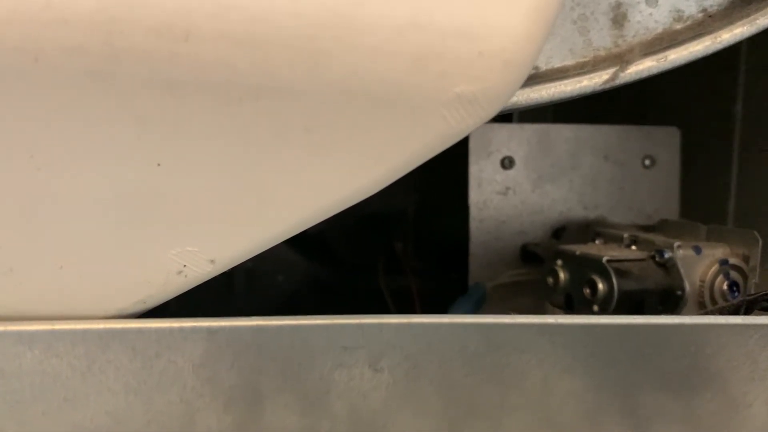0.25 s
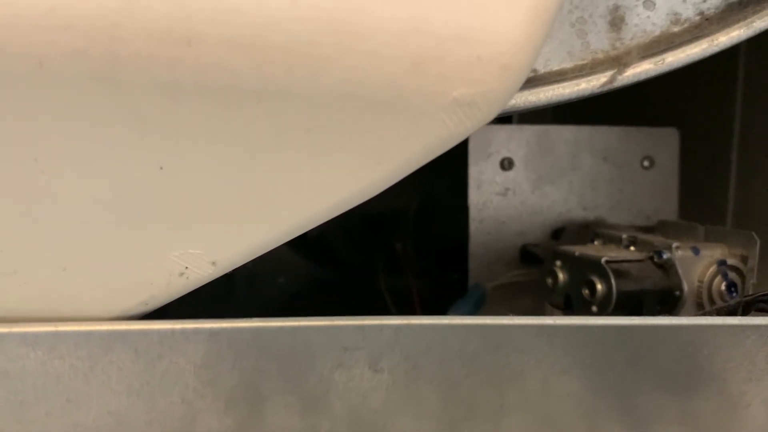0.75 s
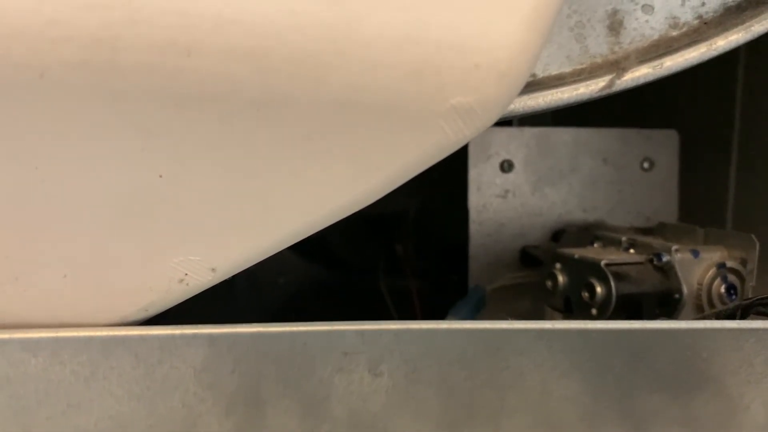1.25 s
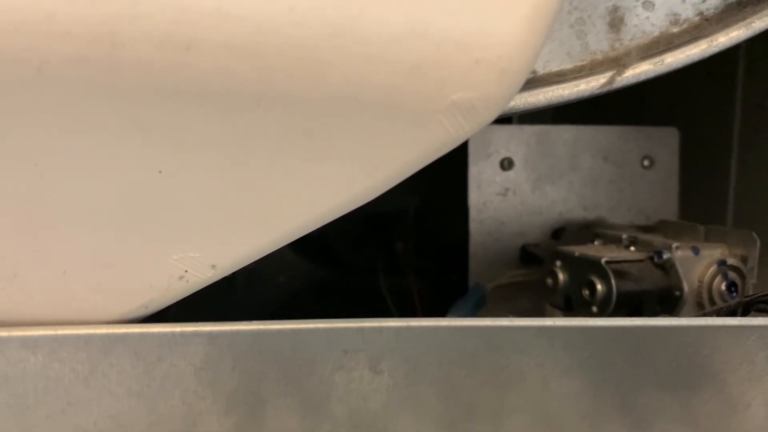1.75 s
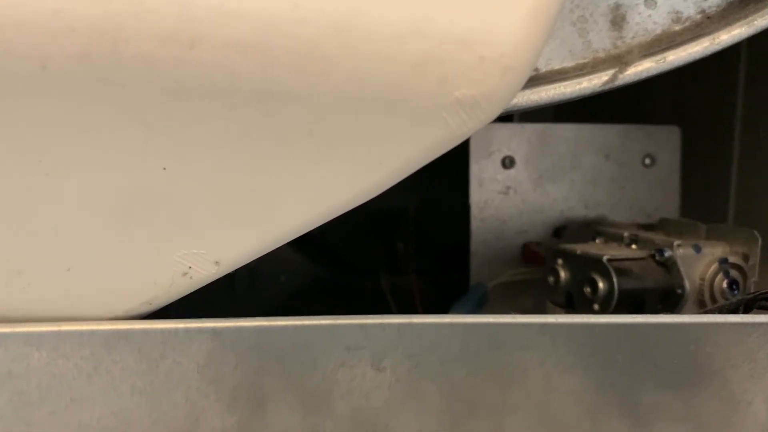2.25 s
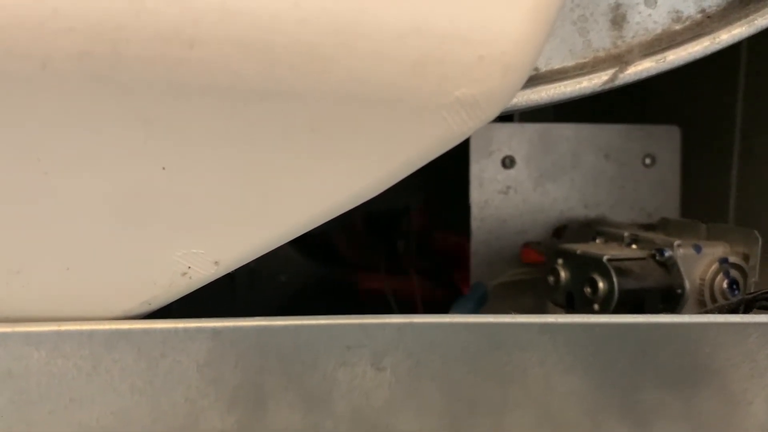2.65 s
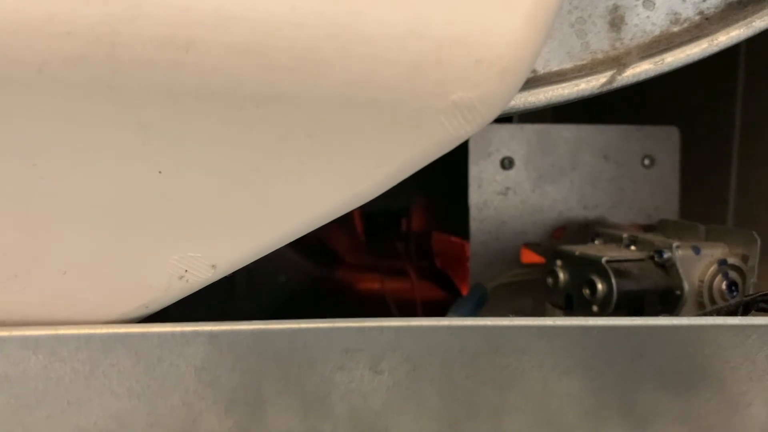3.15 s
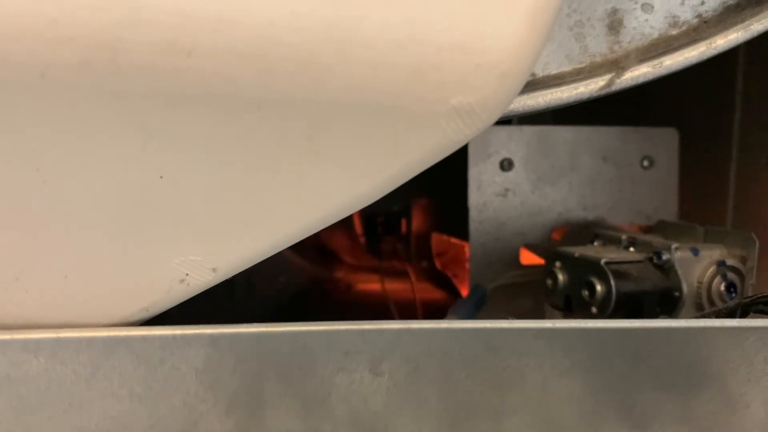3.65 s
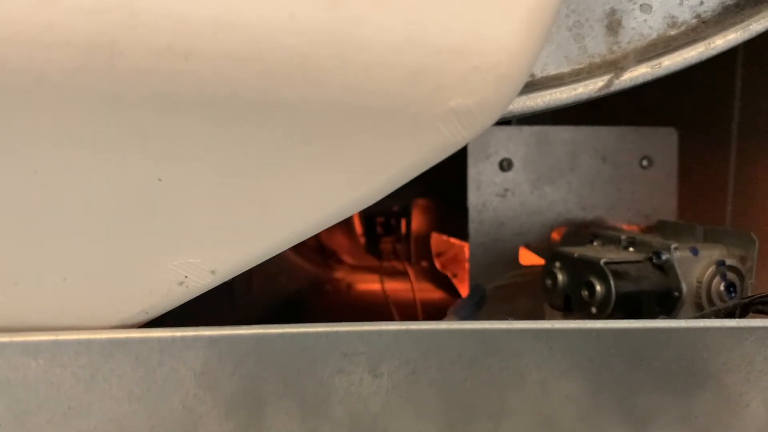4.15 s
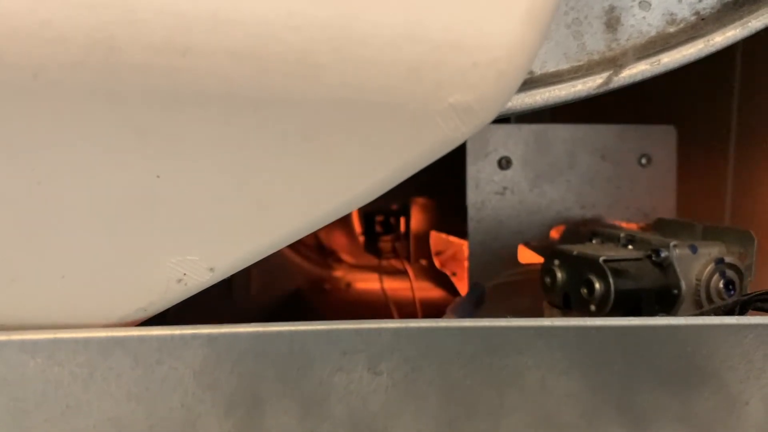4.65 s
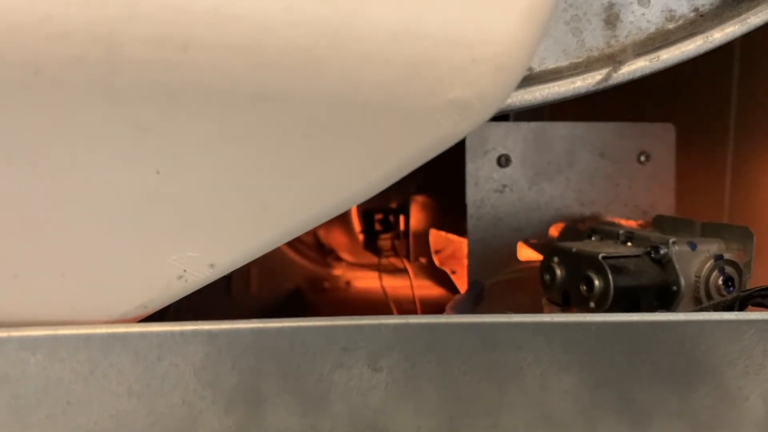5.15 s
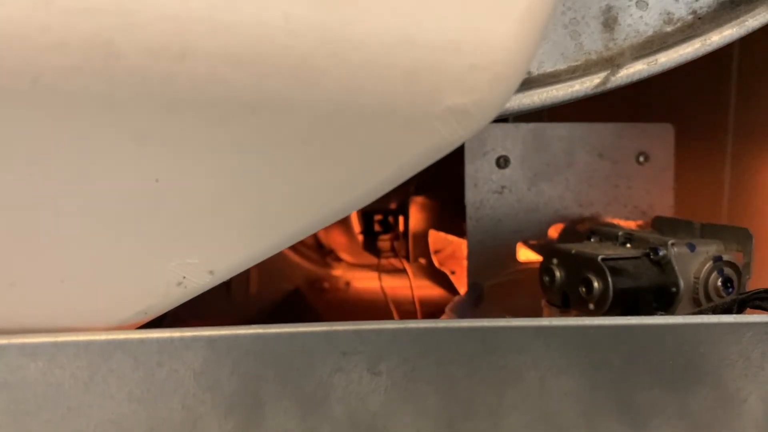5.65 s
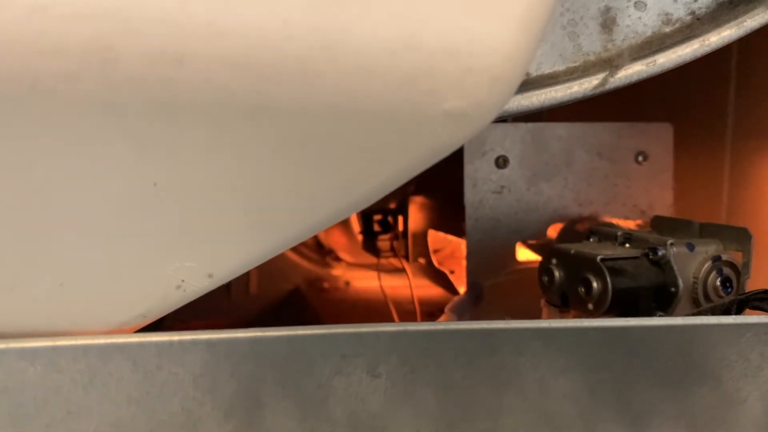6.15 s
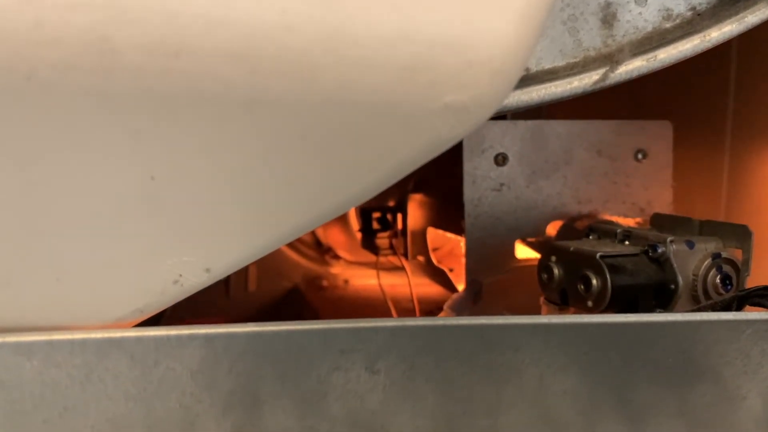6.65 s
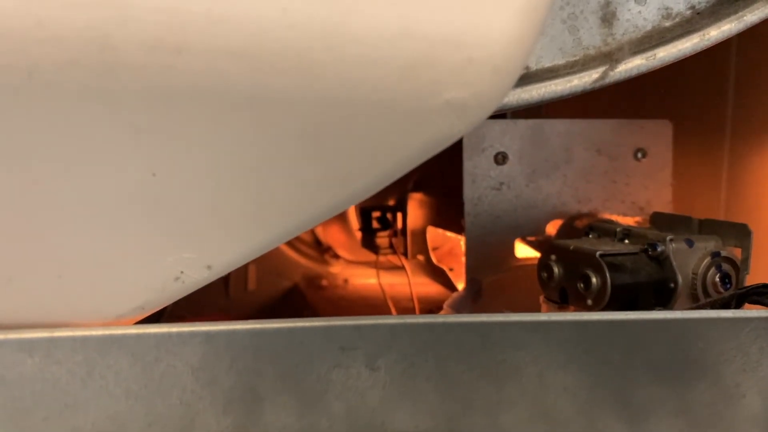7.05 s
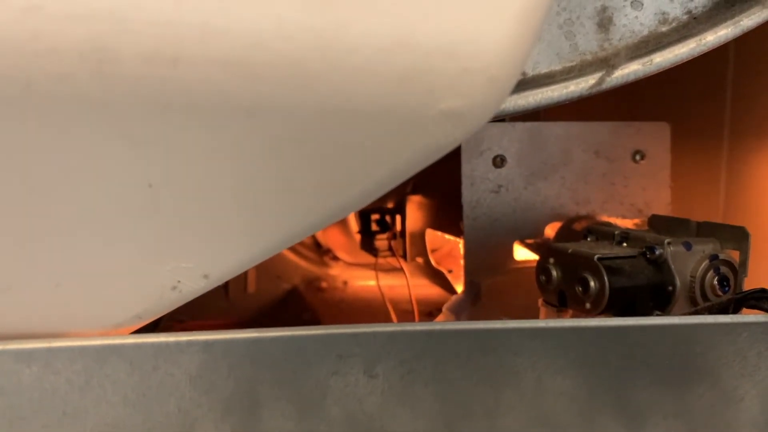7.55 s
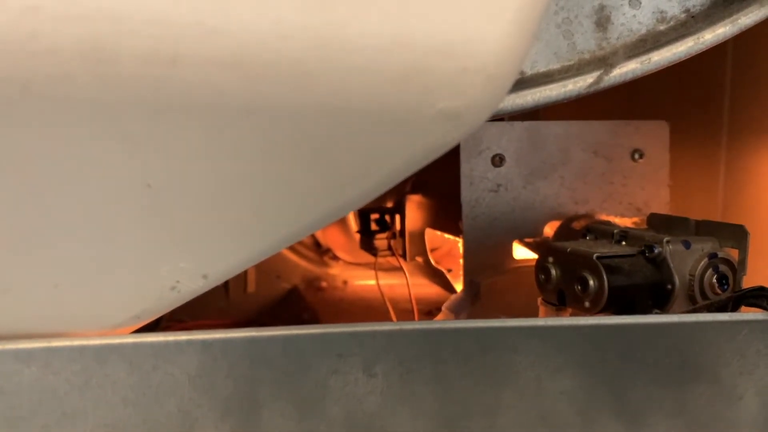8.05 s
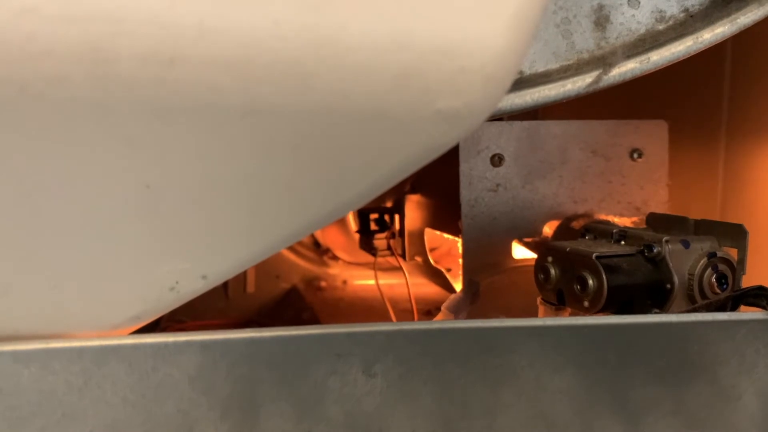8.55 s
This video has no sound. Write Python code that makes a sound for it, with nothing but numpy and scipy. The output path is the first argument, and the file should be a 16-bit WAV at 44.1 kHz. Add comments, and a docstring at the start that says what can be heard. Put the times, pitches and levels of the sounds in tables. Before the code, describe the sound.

Inside an opened gas dryer, heard very close in stereo: a throbbing low electrical motor hum with a faint whine, rolling drum and blower rumble, soft air hiss. Under a second in, a gas valve solenoid snaps with a rattling metallic crack and short ring. The background dips briefly, recovers, and runs steadily; near six seconds everything steps up in level.

```python
"""The motor of a gas dryer hums and whines, heard close with the front panel open: tones at multiples and
sums of the hum and shaft rates. Drum and blower rumble as noise through cabinet resonances. A gas valve's
solenoid snaps in as the igniter starts to heat: cracks, struck modes and a fading ring. Air hisses and the
burner duct surges as coloured noise. The recorder's limiter ducks under the snap; near six seconds the
whole sound steps up in level."""
import sys
import numpy as np
from scipy import signal
from scipy.fft import rfft, irfft, next_fast_len
from scipy.io import wavfile
from scipy.ndimage import uniform_filter1d, minimum_filter1d, map_coordinates

SR = 44100
rng = np.random.default_rng(int(sys.argv[2]) if len(sys.argv) > 2 else 0)


def transcribe(signal):
    """Save signal, clipped to [-1, 1], as a 16-bit WAV file at the path in sys.argv[1]."""
    frames = np.atleast_2d(signal).T
    limited = np.clip(frames, -1, 1)
    pcm = np.round(limited * 32767).astype(np.int16)
    wavfile.write(sys.argv[1], SR, pcm)


N = 388950

HUM_HZ, SHAFT_HZ, POLES = 119.86, 29.257, 4
TOP_HZ = 15850  # band limit
LEAD_S = 0.0004408  # sound reaches the left microphone first
TREBLE_HZ, TREBLE_LAG_S = 6530, 0.00021  # lead shrinks above this pitch, at this slope in s


def amp(db):
    """Decibels to gain."""
    return 10 ** (np.asarray(db) / 20)


def unit(x):
    """x at rms 1."""
    return x / np.sqrt(np.mean(x ** 2) + 1e-20)


def along(points, hz):
    """(Hz, value) points read on a log axis."""
    f, v = np.transpose(points)
    return np.interp(np.log(hz + 1), np.log(f + 1), v)


def clock():
    """The time of every sample in seconds."""
    return np.arange(N) / SR


def wobble(rate_hz):
    """A smooth random curve, rate_hz knots a second."""
    knots = rng.standard_normal(int(N * rate_hz / SR) + 4)
    coarse_s = clock()[::64]
    curve = map_coordinates(knots, [coarse_s * rate_hz], mode="nearest")
    return np.interp(clock(), coarse_s, curve)


def bell(hz, centre_hz, half_width_hz):
    """Gain of a cluster of close resonances."""
    return 1 / (1 + ((hz - centre_hz) / half_width_hz) ** 2)


# Likeness of the two microphones. Each row: frequency in Hz, coherence from 0 to 1.
MIC_COHERENCE = [(60, 0.83), (170, 1), (290, 0.91), (380, 1), (480, 0.87), (620, 0.67), (800, 0.047),
                 (1600, 0.22), (2600, 0.11), (5500, 0.18), (8300, 1), (15000, 0.97)]


def at_microphones(pair, colour):
    """Two unrelated sounds, coloured and blended into what two spaced microphones hear."""
    size = pair.shape[1]
    fft_size = next_fast_len(size + 8192, True)
    hz = np.fft.rfftfreq(fft_size, 1 / SR)
    a, b = rfft(pair, fft_size)
    turn = np.arccos(np.clip(along(MIC_COHERENCE, hz), 0, 1)) / 2
    lead_cycles = LEAD_S * np.minimum(hz, TREBLE_HZ) - TREBLE_LAG_S * np.maximum(hz - TREBLE_HZ, 0)
    left = np.cos(turn) * a + np.sin(turn) * b
    right = (np.cos(turn) * a - np.sin(turn) * b) * np.exp(-2j * np.pi * lead_cycles)
    return irfft(np.array([left, right]) * colour(hz), fft_size)[:, :size]


def stereo_noise(colour):
    """Noise at the two microphones; colour gives its amplitude per root Hz."""
    return at_microphones(rng.standard_normal((2, N)) * np.sqrt(SR / 2), colour)


def tone(hz, t, left_db, right_db, lead_s, start_cycles):
    """A sine at the two microphones on the time base t; the left leads by lead_s."""
    phase = 2 * np.pi * (hz * np.array([t, t - lead_s]) + start_cycles)
    return amp([[left_db], [right_db]]) * np.sqrt(2) * np.sin(phase, dtype=np.float32)


def motor():
    """An induction motor: every tone follows from the hum rate and the shaft rate."""
    return hum() + rotor() + whine()


# Magnetic hum, one row per harmonic from the first up. Each row: left level in dB rms, right level in
# dB rms, lead of the left in seconds, level of the beating rotor tone in dB relative to the harmonic.
HUM_HARMONICS = [(-38.5, -39.8, .0003, -14), (-48.5, -50, -.00077, -5), (-59, -51, .0011, -16),
                 (-63, -62.5, 0.0062, -15), (-52, -55.5, .0003, -24)]


def hum(level_db=0., waver_db=1.2, in_step_s=0.183):
    """Hum at twice the mains rate throbs as the slipping rotor's poles fall in and out of step with it."""
    t = clock() - in_step_s  # rotor and hum in step at t = 0: the throb crests
    out = np.zeros((2, N))
    for k, (left_db, right_db, lead_s, throb_db) in enumerate(HUM_HARMONICS, 1):
        place = left_db, right_db, lead_s, rng.random()
        magnetic = tone(k * HUM_HZ, t, *place)
        slipping = amp(throb_db) * tone(k * POLES * SHAFT_HZ, t, *place)
        out += amp(level_db + waver_db * wobble(5.1)) * (magnetic + slipping)
    return out


# Stereo balance of shaft tones and sidebands. Each row: frequency in Hz, left minus right in dB.
TONE_BALANCE = [(60, 8.5), (330, 2.5), (390, 7), (730, 15), (1400, 2.5)]


def panned(hz, t, db):
    """A tone of the rotor, placed by its pitch."""
    pan_db = along(TONE_BALANCE, hz)
    return tone(hz, t, db + pan_db / 2, db - pan_db / 2, LEAD_S, rng.random())


# Tones of the turning rotor and blower wheel. Each row: multiple of the shaft rate, level in dB rms.
SHAFT_ORDERS = [(2, -59), (5, -63), (6, -57.5), (10, -62.5), (25, -69.5), (37, -72), (44, -69)]
# Sidebands one shaft rate either side of the hum harmonics. Each row: frequency in Hz, level in dB rms.
HUM_SIDEBANDS = [(90, -68), (150, -56.5), (210, -57), (270, -62.5), (330, -54.5), (390, -62), (630, -70)]


def rotor(level_db=0.):
    """The rotor sounds its own orders and, slightly off centre, puts sidebands on the hum."""
    t, out = clock(), np.zeros((2, N))
    for order, db in SHAFT_ORDERS:
        out += panned(round(order) * SHAFT_HZ, t, db)
    for k in range(1, len(HUM_HARMONICS) + 1):
        for side in (-1, 1):
            hz = k * HUM_HZ + side * SHAFT_HZ
            out += panned(hz, t, along(HUM_SIDEBANDS, hz))
    return amp(level_db) * out


# Sidebands higher up, heard as a whine. Each row: frequency in Hz, level in dB.
WHINE_SIDEBANDS = [(700, -78), (850, -73.5), (1060, -89), (1170, -72.5), (1320, -84), (1410, -65),
                   (1530, -80.5), (1590, -76), (1650, -71), (1890, -86), (1950, -94), (2067, -74.5),
                   (2130, -87.5)]


def whine(level_db=0., centre_db=-10.0, slip_s=.00006, waver_db=0.3, count=13):
    """Higher hum harmonics, set below their two sidebands, waver as the drum's load drags on the rotor."""
    t, out = clock() + slip_s * wobble(2.49), np.zeros((2, N))
    for k in len(HUM_HARMONICS) + 1 + np.arange(count):
        group = np.zeros((2, N))
        for side, relative_db in [(-1, 0), (0, centre_db), (1, 0)]:
            hz = k * HUM_HZ + side * SHAFT_HZ
            group += panned(hz, t, along(WHINE_SIDEBANDS, hz) + relative_db)
        out += amp(level_db + waver_db * wobble(4.5)) * group
    return out


# Cabinet resonances stirred by drum and blower. Each row: centre in Hz, half width in Hz, left peak in
# dB per Hz, right peak in dB per Hz.
CABINET_MODES = [(38, 2.8, -78, -69), (70, 21.5, -67, -66.5), (115.3, 19.5, -62, -62.5),
                 (153, 16, -67.5, -66.5), (180.7, 7.3, -62.5, -65), (195, 8.7, -64.5, -65),
                 (236, 19, -67, -69), (290.4, 12, -71, -69.5), (345.2, 14.5, -64.5, -68),
                 (407.2, 7.5, -67, -70.5), (451.8, 11.5, -64, -71.5), (525, 45.6, -66, -74),
                 (571.7, 8.9, -64.5, -69.5), (618, 9.6, -70.5, -80.5), (637.6, 4.8, -70.5, -77)]


def drum(level_db=0., swell_db=0.85):
    """The rolling drum and the blower shake the cabinet's panels and cavity."""
    def panels(hz):
        power = 0
        for centre_hz, half_width_hz, left_db, right_db in CABINET_MODES:
            power = power + (amp([[left_db], [right_db]]) * bell(hz, centre_hz, half_width_hz)) ** 2
        return np.sqrt(power)

    return amp(level_db + swell_db * wobble(7)) * stereo_noise(panels)


def valve():
    """The gas valve's solenoid snaps in."""
    return plunger() + ring()


def add(track, s, sound):
    """Mix a sound into the track at time s."""
    track[:, round(s * SR):][:, :sound.shape[1]] += sound


# Modes of the valve and its bracket. Each row: centre in Hz, half width in Hz, then the level in dB as
# struck, as they clang and as they linger.
BRACKET_MODES = [(1735, 110, -46, -38, -56), (2380, 85, -35.5, -41, -56), (3134, 60, -30.5, -34, -49.5),
                 (3990, 100, -28, -34, -48), (4560, 140, -44, -42, -60), (5420, 120, -37, -39.5, -58),
                 (6420, 200, -37, -39, -59), (6930, 200, -36, -37, -54), (7260, 160, -35, -27, -51),
                 (8060, 130, -27.5, -35, -49), (9600, 200, -41, -38, -59), (12500, 350, -43, -45, -64),
                 (15100, 450, -43, -41, -63)]
# Contacts of the solenoid plunger. Each row: start in seconds, level in dB, brightness in dB per octave.
PLUNGER_CONTACTS = [(0.6976, -7, 8), (0.701, -8, 3), (0.7066, -8, 2), (0.7114, 1.5, 3.5),
                    (0.7148, 0.5, 1.5), (0.716, 3, -3), (0.7183, -4.5, 4), (0.7242, -2, 1),
                    (0.7338, -8, -3), (0.7423, -6, 0), (0.7505, -10, -2)]


def plunger(level_db=0., crack_db=-26.5, crack_t60_s=0.027, mode_t60_s=0.038, rise_s=0.00014,
            pivot_hz=6000, low_cut_hz=850):
    """The plunger ticks, slams and rattles to rest: each contact is a crack and a knock of the modes."""
    out, t = np.zeros((2, N)), np.arange(SR // 8) / SR

    def fade(t60_s):
        return amp(-60 * t / t60_s) * (1 - np.exp(-t / rise_s))

    for start_s, db, brightness in PLUNGER_CONTACTS:
        def colour(hz):
            octaves = np.log2(np.clip(hz, BRACKET_MODES[0][0], TOP_HZ) / pivot_hz)
            return amp(brightness * octaves) * hz ** 2 / (hz ** 2 + low_cut_hz ** 2)

        knock = np.zeros((2, len(t)))
        for centre_hz, half_width_hz, struck_db, _, _ in BRACKET_MODES:
            phase = 2 * np.pi * rng.random((2, 1))
            # each contact stirs another member of every cluster
            hz = centre_hz + rng.uniform(-1.06, 1, (2, 1)) * half_width_hz
            knock += amp(struck_db) * np.sqrt(2) * np.sin(2 * np.pi * hz * t + phase)
        crack = amp(crack_db) * rng.standard_normal((2, len(t)))
        contact = fade(mode_t60_s) * knock + fade(crack_t60_s) * crack
        add(out, start_s, amp(level_db + db) * at_microphones(contact, colour))
    return out


def burst(colour):
    """One and a half seconds of coloured stereo noise at rms 1."""
    return unit(at_microphones(rng.standard_normal((2, 3 * SR // 2)), colour))


def dying(x, t60s):
    """x with each frequency fading at its own speed."""
    hz, t, bins = signal.stft(x, SR, nperseg=256)
    faded = bins * amp(-60 * t / along(t60s, hz)[:, None])
    return signal.istft(faded, SR, nperseg=256)[1][:, :x.shape[1]]


# Colour of the sheet steel around the valve. Each row: frequency in Hz, relative level in dB.
STEEL_COLOUR = [(100, -8), (500, 1), (850, 9), (1100, 1), (1500, 5), (2800, 1), (4800, -2), (5800, 2),
                (8500, 2), (11000, -2), (15500, -6)]
# Decay of the clang. Each row: frequency in Hz, time to fall 60 dB in seconds.
CLANG_T60 = [(1700, 0.28), (3000, 0.29), (7300, 0.2), (14000, 0.14)]
# Decay of the lingering ring. Each row: frequency in Hz, time to fall 60 dB in seconds.
LINGER_T60 = [(1000, 1.8), (3100, 1.6), (4000, 1.46), (7500, 0.95), (12000, 0.39)]


def ring(clang_db=0.0, linger_db=0., sheet_db=-28.5, sheet_linger_db=-44.0, start_s=.716, rise_s=0.0033,
         beat_db=2.5, split_share=.0009):
    """Bracket and steel ring on: a short clang, then a faint shimmer of split modes, each beating."""
    def sheet(hz):
        return amp(along(STEEL_COLOUR, hz))

    clang, linger = amp(sheet_db) * burst(sheet), amp(sheet_linger_db) * burst(sheet)
    t = clock()[:linger.shape[1]]
    for centre_hz, half_width_hz, _, mode_clang_db, mode_linger_db in BRACKET_MODES:
        def cluster(hz):
            return bell(hz, centre_hz, half_width_hz)

        swell_db = beat_db * np.cos(2 * np.pi * split_share * centre_hz * t)
        clang = clang + amp(mode_clang_db) * burst(cluster)
        linger = linger + amp(mode_linger_db + swell_db) * burst(cluster)
    sound = amp(clang_db) * dying(clang, CLANG_T60) + amp(linger_db) * dying(linger, LINGER_T60)
    out = np.zeros((2, N))
    add(out, start_s, sound * (1 - np.exp(-t / rise_s)))
    return out


def ripple(hz, depth_db, spacing_hz):
    """Gain of the many narrow peaks and dips of a steel enclosure, at mean power 1."""
    grid_hz = np.arange(0, SR / 2, spacing_hz)
    return np.interp(hz, grid_hz, unit(amp(depth_db * rng.standard_normal(len(grid_hz)))))


# Rush of the air stream. Each row: frequency in Hz, level in dB per Hz.
AIR_SPECTRUM = [(20, -110), (300, -79), (660, -82), (820, -82), (1080, -89), (1300, -88.5), (1450, -90),
                (1720, -92.5), (1920, -94.5), (2450, -96), (2790, -98), (3300, -97), (5000, -102.5),
                (7000, -106), (7700, -111), (8500, -107.5), (10500, -114), (13000, -115), (15500, -120)]


def air(level_db=0., flutter_db=0.68):
    """Air drawn past the burner hisses almost evenly, coloured by the enclosure."""
    def colour(hz):
        return amp(along(AIR_SPECTRUM, hz)) * ripple(hz, depth_db=3.0, spacing_hz=17)

    return amp(level_db + flutter_db * wobble(12)) * stereo_noise(colour)


# Resonances of the burner duct. Each row: centre in Hz, half width in Hz, level in dB before flutter.
DUCT_MODES = [(1297, 90, -72.5), (1694, 120, -68), (2440, 270, -73.5)]


def duct(flutter_db=2.5, puff_db=1.4, surge_db=1.0):
    """The draught sounds broad duct resonances in shared surges and puffs; each also flutters alone."""
    puffs_db = surge_db * wobble(2.9) + puff_db * wobble(16)
    out = np.zeros((2, N))
    for centre_hz, half_width_hz, db in DUCT_MODES:
        resonance = unit(stereo_noise(lambda hz: bell(hz, centre_hz, half_width_hz)))
        out += amp(db + puffs_db + flutter_db * wobble(20)) * resonance
    return out


def scene():
    """The running machine and the one snap of its valve."""
    return motor() + drum() + valve() + air() + duct()


def limiter(x, ceiling_db=-27.5, attack_s=0.0075, hold_s=0.1, release_db_per_s=69.0, sense_hz=1000):
    """Loud treble pulls the gain down, too slowly to catch the first crack; it holds, then climbs back."""
    def trailing(v, half):
        return uniform_filter1d(v, 2 * half + 1, origin=half)

    high_pass = signal.butter(2, sense_hz, "high", fs=SR, output="sos")
    treble = signal.sosfilt(high_pass, x)
    attack_half, hold_half = int(attack_s * SR / 2), int(hold_s * SR / 2)
    power = np.abs(trailing(np.mean(treble ** 2, axis=0), attack_half))
    needed_db = np.minimum(0, ceiling_db - 10 * np.log10(power + 1e-12))
    held_db = minimum_filter1d(needed_db, 2 * hold_half + 1, origin=hold_half)
    climb_db = release_db_per_s * clock()
    gain_db = np.minimum.accumulate(held_db - climb_db) + climb_db
    return x * amp(trailing(gain_db, attack_half))


def record(dry, step_db=4.0, step_s=6.082, step_rise_s=.003):
    """Limiter, a quick step up in level, and the band limit."""
    risen = np.clip((clock() - step_s) / step_rise_s + .5, 0, 1)
    stepped = limiter(dry) * amp(step_db * risen)
    low_pass = signal.firwin(401, TOP_HZ, fs=SR)
    return signal.filtfilt(low_pass, 1, stepped)


dry = scene()
out = record(dry)
transcribe(out)
```